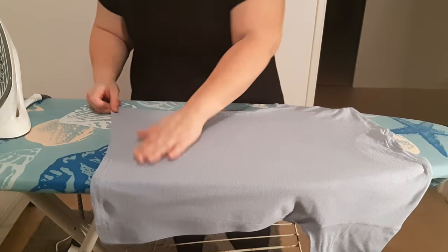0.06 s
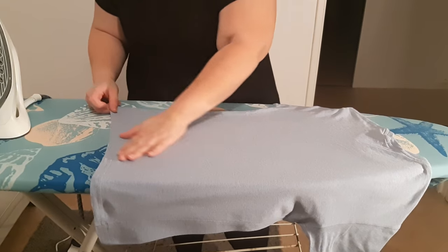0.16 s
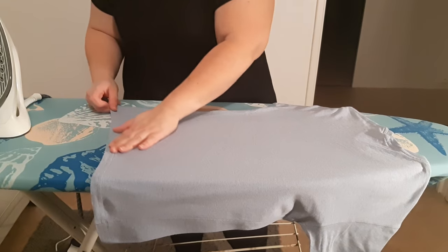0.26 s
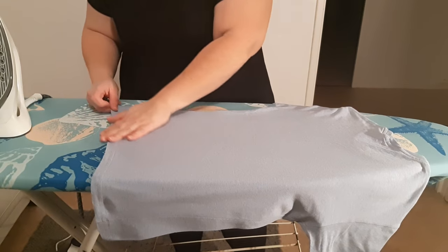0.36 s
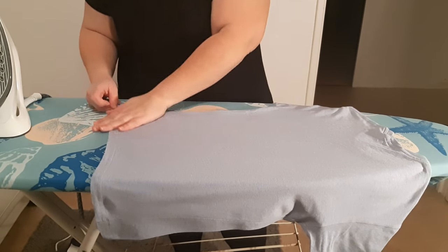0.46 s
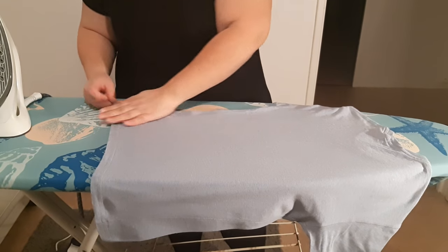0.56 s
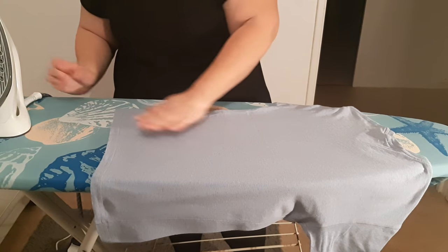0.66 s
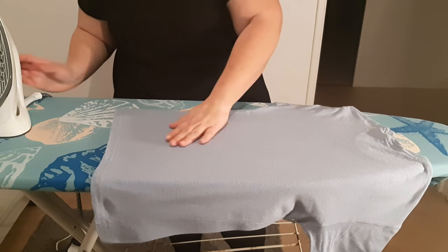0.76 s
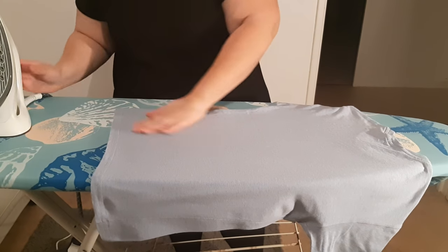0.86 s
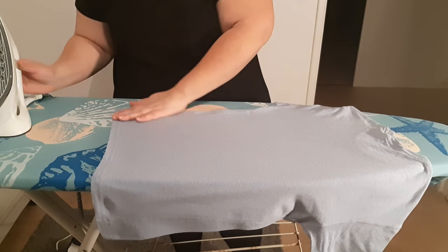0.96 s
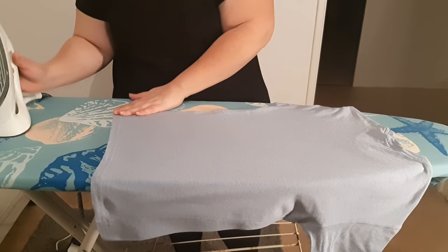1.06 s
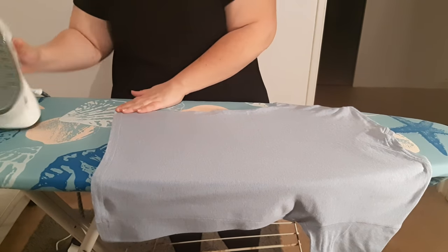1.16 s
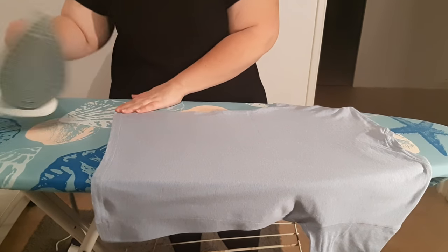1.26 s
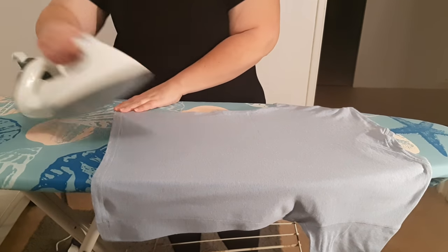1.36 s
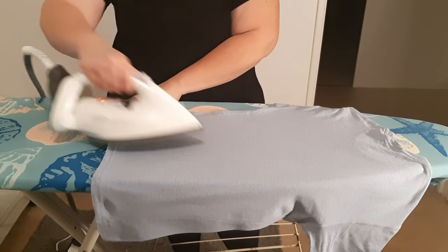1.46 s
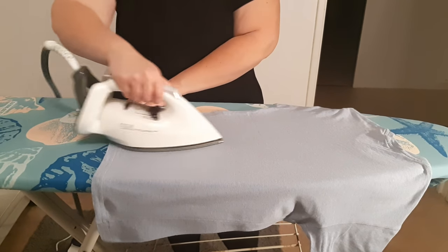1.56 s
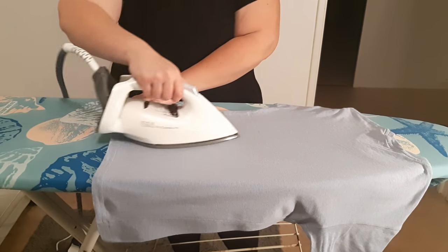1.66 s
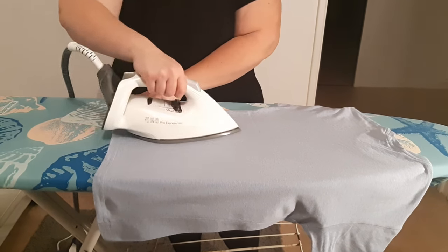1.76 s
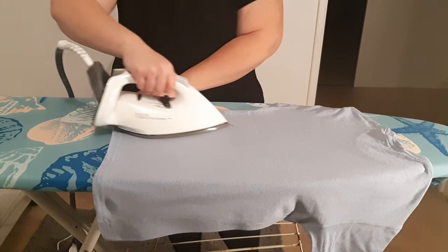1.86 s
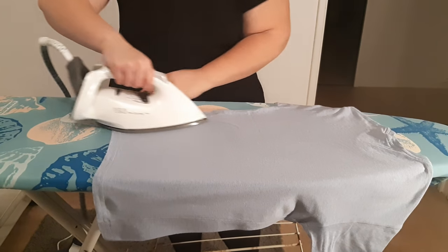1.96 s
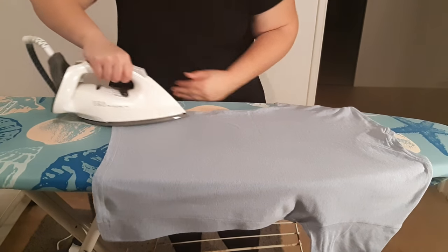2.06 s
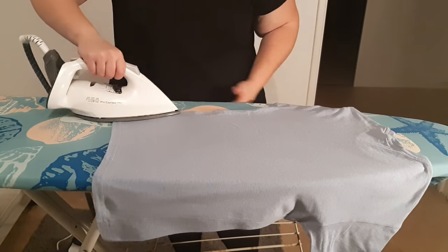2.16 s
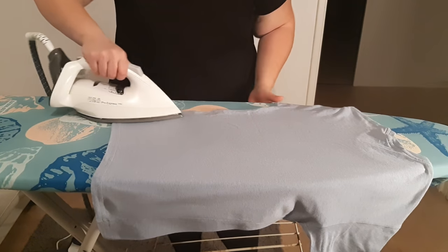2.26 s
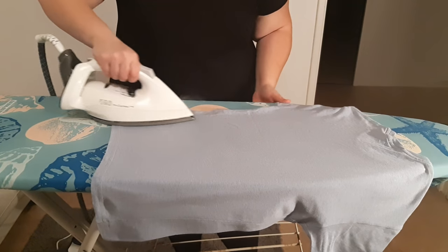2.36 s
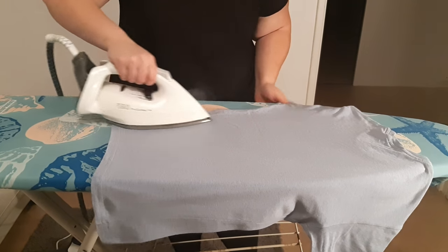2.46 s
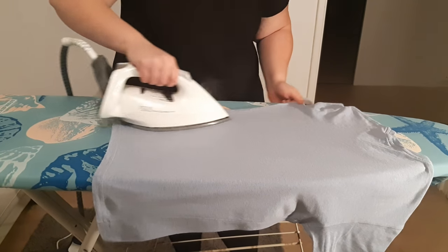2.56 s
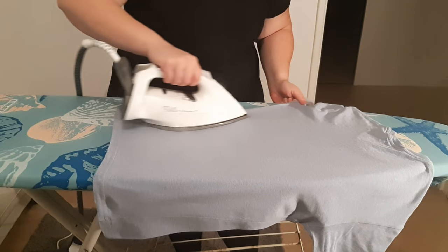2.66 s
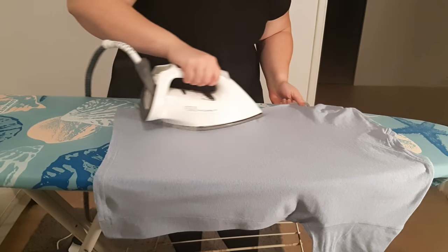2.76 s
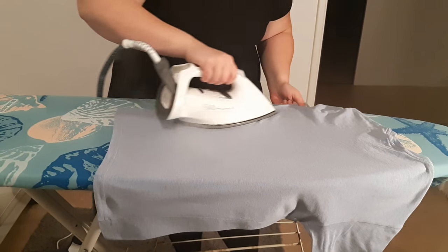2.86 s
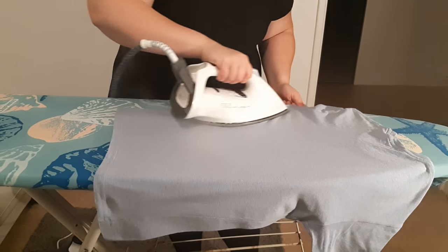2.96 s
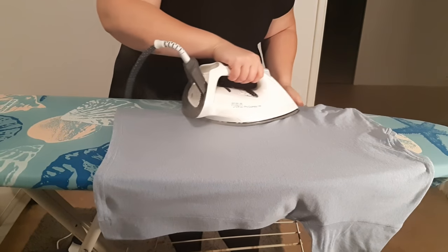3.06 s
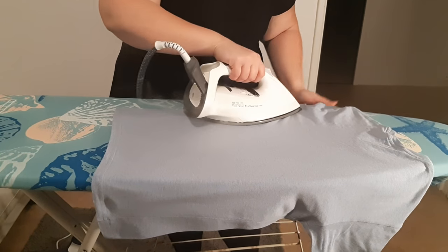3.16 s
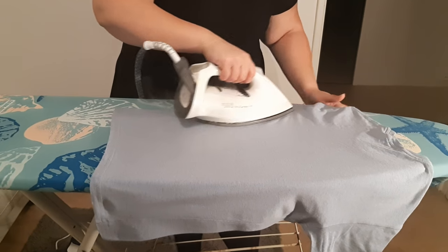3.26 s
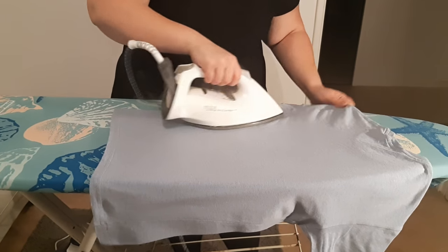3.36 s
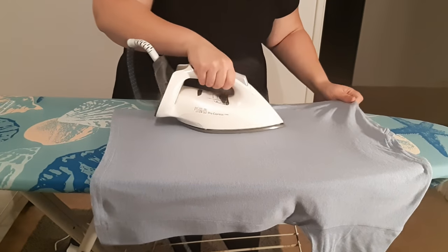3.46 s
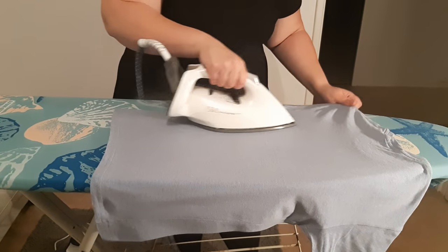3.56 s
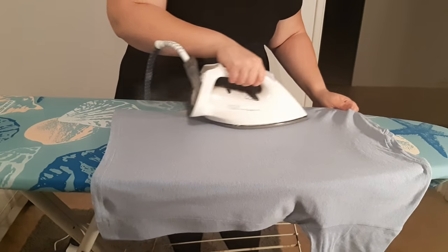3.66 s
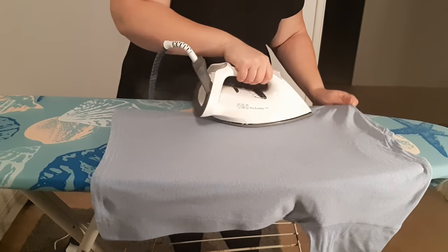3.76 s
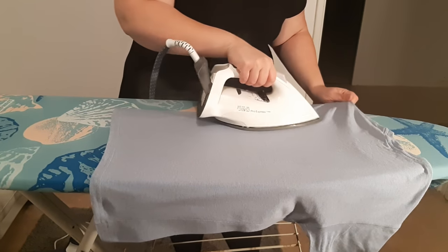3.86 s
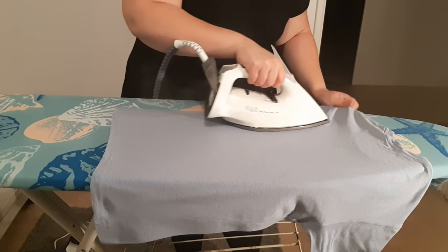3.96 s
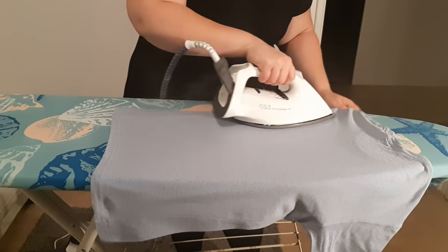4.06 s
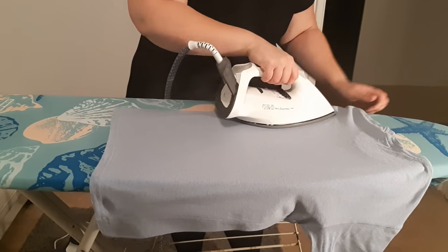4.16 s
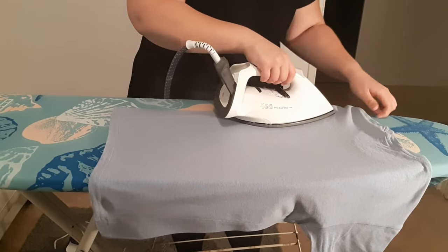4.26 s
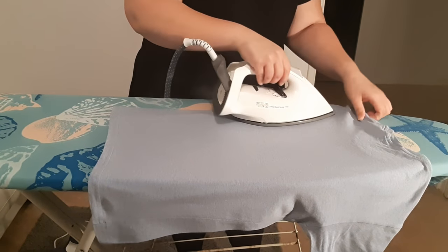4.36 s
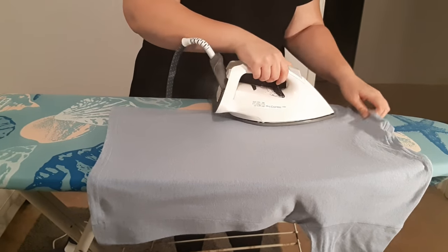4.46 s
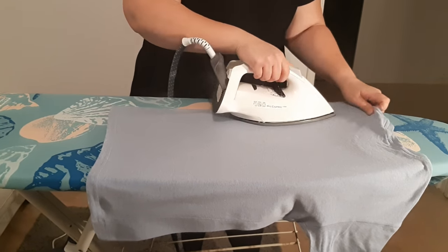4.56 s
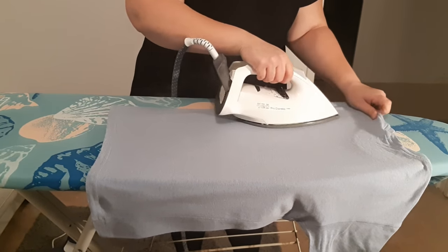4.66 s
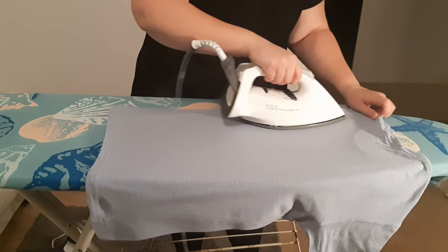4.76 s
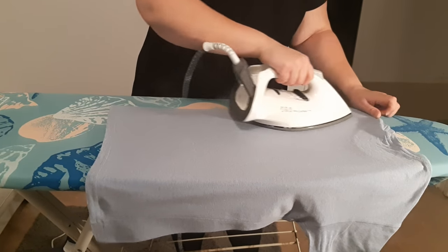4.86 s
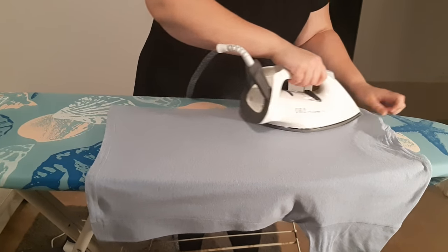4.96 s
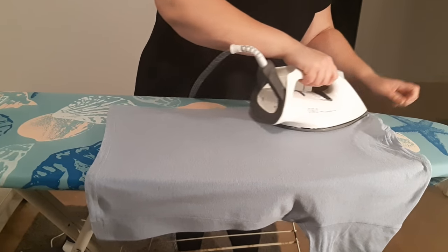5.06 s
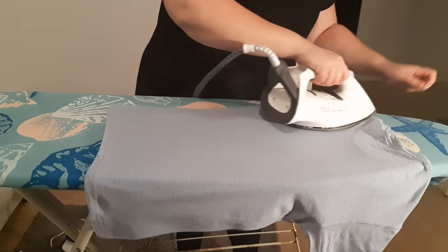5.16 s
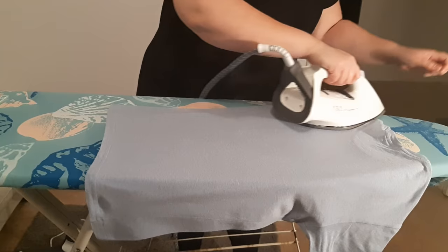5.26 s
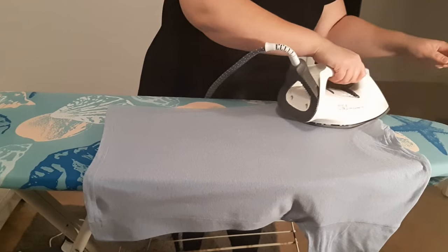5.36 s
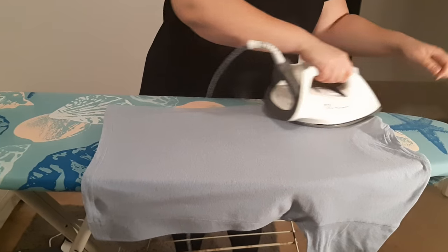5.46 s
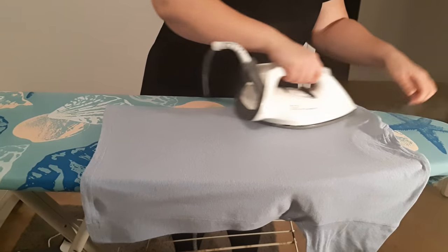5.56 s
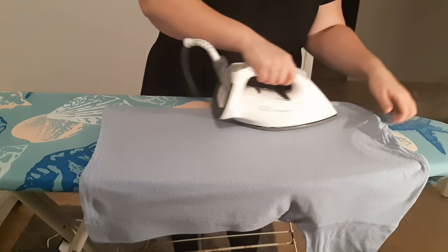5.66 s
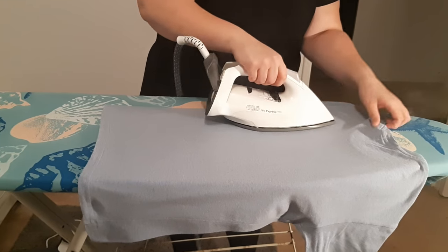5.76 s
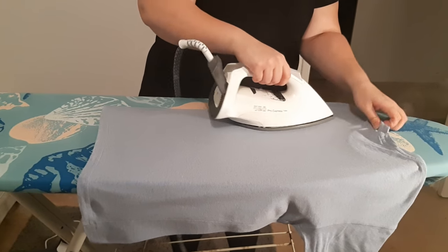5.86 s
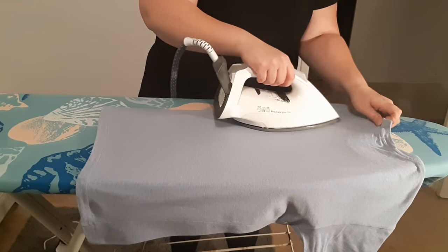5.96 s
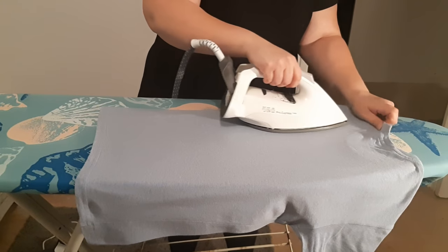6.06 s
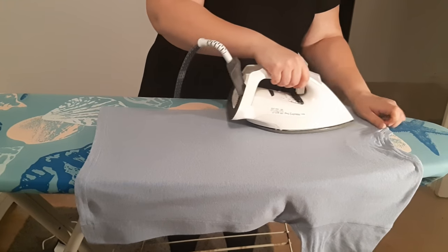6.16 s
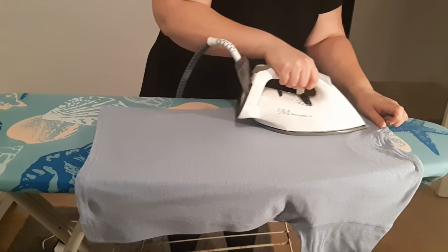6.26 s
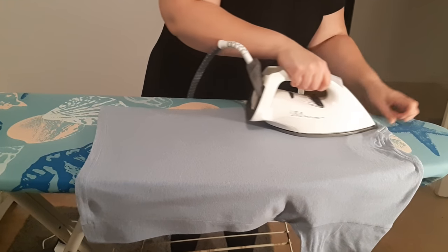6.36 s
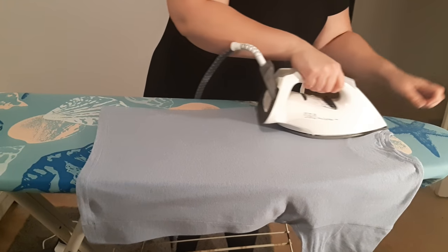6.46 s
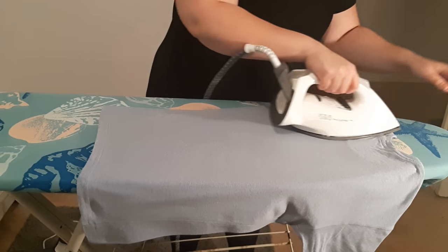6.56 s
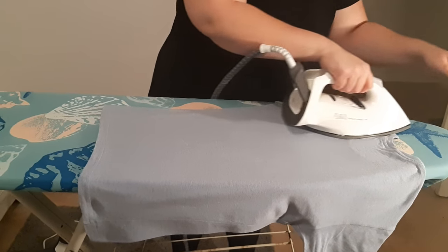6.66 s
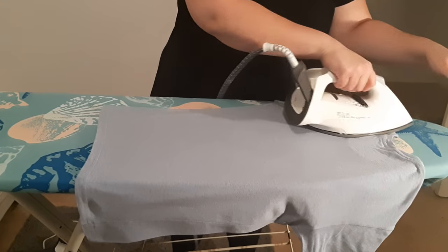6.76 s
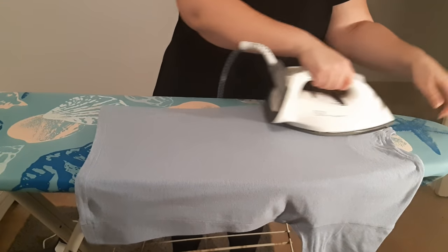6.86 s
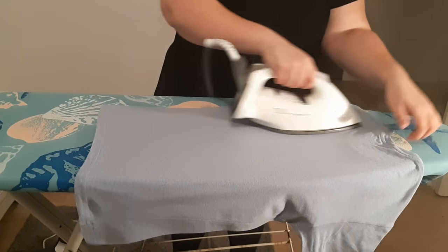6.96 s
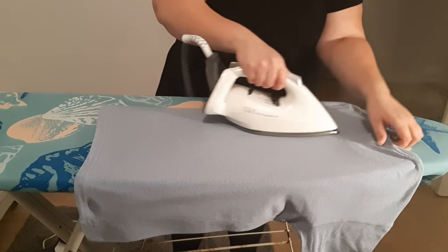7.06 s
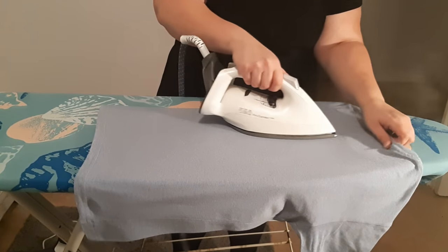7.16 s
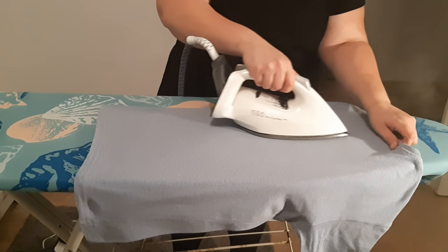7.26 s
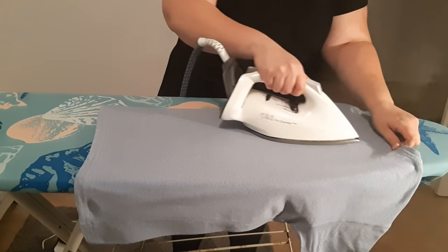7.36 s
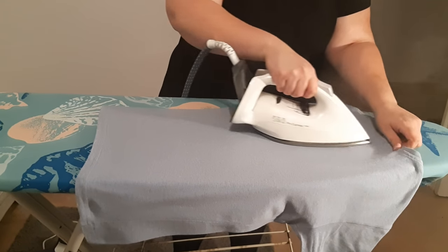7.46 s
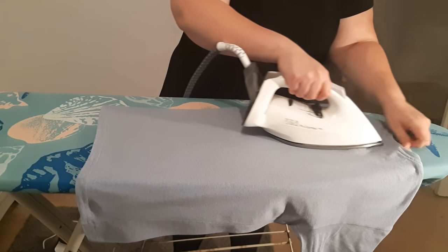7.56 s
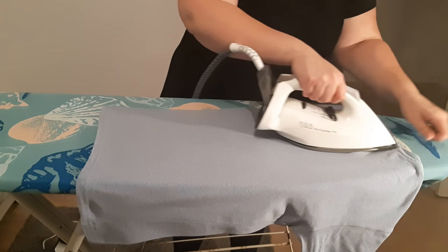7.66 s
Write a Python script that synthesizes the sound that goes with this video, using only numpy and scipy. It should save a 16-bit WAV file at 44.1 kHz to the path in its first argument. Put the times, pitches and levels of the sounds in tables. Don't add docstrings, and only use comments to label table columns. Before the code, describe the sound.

Close stereo pickup in a quiet living room with a low house rumble. A hand softly rustles over cotton, then the iron lands with a cluster of padded knocks and a squeeze of steam. A valve clunks open and a long steam burst roars and hisses, ending in a dull thud. Three shorter bursts follow, separated by faint cloth rubbing, ticks and spitting drops, and a last burst begins at the end.

```python
import sys
import numpy as np
from scipy import signal
from scipy.fft import rfft, irfft, next_fast_len
from scipy.io import wavfile
from scipy.ndimage import uniform_filter1d

SR = 44100
rng = np.random.default_rng(int(sys.argv[2]) if len(sys.argv) > 2 else 0)


def wav_out(sig):
    wavfile.write(sys.argv[1], SR, np.round(np.clip(np.atleast_2d(sig).T, -1, 1) * 32767).astype(np.int16))


def volts(x):
    e = np.asarray(x, float) / 20
    return 10 ** e


N = 340452
SIZE = next_fast_len(N)
HZ = np.maximum(np.arange(SIZE // 2 + 1) * SR / SIZE, 1)
T = np.arange(N) / SR

# (frequency [Hz], density [dB per Hz])
ROOM_TONE = [(190, -48), (330, 2.5), (520, -1.5), (800, -4), (976, 3), (1170, -2), (1990, 5), (4540, -12),
             (5430, -12), (6700, -35), (8000, -13), (15800, -6.5)]
# (frequency [Hz], left minus right [dB])
ROOM_LEAN = [(60, 1), (110, 0.0), (200, 0.5), (380, 2), (700, -2), (1290, -7), (2380, 7), (4400, -10),
             (8120, -5), (15000, 1)]
# (frequency [Hz], density [dB per Hz])
RUMBLE = [(12, -53), (20, -23), (32, -29), (48, -22), (63, -8), (102, 3.5), (163, -1.5), (188, 4.5),
          (206, -13.5), (330, -9.5), (430, -23.5), (730, -120)]
# (frequency [Hz], likeness [0..1])
LIKENESS = [(30, .75), (130, 0.88), (290, 0.97), (640, 0.65), (1400, 0.018), (15000, 0.032)]
# (frequency [Hz], width [Hz], lift [dB])
STANDING = [(235, 12, 1.5), (364.4, 11, 6.5), (975, 35, 3.5), (1138, 9.7, 6), (1389, 24, 5.5),
            (1720, 9.8, 5), (1860, 50, 1), (2162, 18, 4), (2297, 13, 4.5), (2030, 20, 2.5), (3310, 21, 4.5),
            (3750, 20, 5), (4610, 27, 4.5), (4840, 27, 2)]
# (frequency [Hz], gain [dB])
LEFT_PORT = [(300, 0.5), (1000, -3.4), (2500, 0), (3500, -5.5), (4000, -6), (5000, -16.5), (6000, -41),
             (6300, -74), (8100, -80), (8500, -41.5), (11800, -23), (14300, -37), (15500, -34),
             (16000, -90)]
RIGHT_PORT = [(300, -0.06), (1000, 0.5), (2500, 1), (3600, 2.5), (4800, -1.5), (5300, -12), (5900, -9),
              (6700, -8.5), (7400, -15), (8000, -20), (11800, -19), (14000, -22.5), (15750, -29),
              (16000, -87)]

# (start [s], rise [s], length [s], level [dB])
DRAGS = [(-.05, .03, 0.089, -66.5), (0.13, 0.013, 0.092, -69.5), (.27, .05, 0.16, -71),
         (1.087, 0.096, 0.35, -67), (1.587, 0.034, 0.23, -57), (1.853, 0.042, 0.68, -51.5),
         (3.104, 0.12, 0.33, -53), (3.828, 0.058, 0.28, -54.5), (4.15, .06, 0.16, -47.5),
         (4.35, .03, 0.097, -59), (5.294, 0.097, 0.24, -49), (6.287, 0.04, 0.12, -62.5),
         (6.55, 0.36, 0.41, -51), (7.36, 0.03, 0.1, -70), (7.456, .02, .15, -62.5)]
# (frequency [Hz], density [dB per Hz])
DRAG_COLOUR = [(60, -24), (150, -4), (350, -1), (700, -5), (1200, -3), (2500, -8.5)]
# (start [s], rise [s], length [s], peak [dB], end level [dB])
SWISHES = [
    (.14, 0.1, 0.37, -46, -47),
    (.88, .13, 0.24, -45, -46),
    (1.25, 0.084, 0.22, -39.5, -45),
    (6.35, .03, .05, -43, -41),
    (7.36, 0.084, 0.12, -33.5, -37),
]
# (start [s], rise [s], length [s], peak [dB], end level [dB])
STROKES = [(-.05, .03, 0.067, -62, -85), (.13, 0.083, 0.35, -65, -60), (.45, .05, 0.14, -67, -65),
           (.85, 0.16, 0.38, -52.5, -68.5), (1.26, 0.081, 0.26, -64, -75), (3.446, 0.012, 0.045, -43, -48),
           (3.5, .02, .13, -54, -58), (4.5, 0.027, 0.2, -64, -76), (4.69, 0.12, 0.27, -50.5, -56),
           (5.7, .03, 0.31, -55, -85), (5.99, .03, 0.08, -73, -79), (6.1, 0.0054, 0.19, -58.5, -66.5),
           (6.28, 0.043, 0.19, -52, -56.5), (7.15, 0.057, 0.18, -63, -75), (7.35, 0.12, 0.37, -49.5, -68)]
# (frequency [Hz], density [dB per Hz])
CLOTH_COLOUR = [(60, -20), (200, -9.5), (500, -14.5), (1000, -9), (1500, -2), (2500, 0.3), (5000, 2),
                (7000, 6), (9000, 1.5), (16000, -6)]
# (frequency [Hz], share of the level swing)
STROKE_FOLLOW = [(400, 0.73), (1800, 0.81), (5000, 0.93), (7000, 0.3), (12000, .99)]

# (time [s], level [dB])
LANDINGS = [(.131, -28), (.152, -34), (.175, -35), (.218, -38), (.335, -35), (.358, -37), (.397, -36),
            (.49, -38), (1.559, -22), (1.572, -12.5), (1.585, -10.5), (1.606, -19), (1.619, -11),
            (1.67, -21), (1.725, -23), (1.76, -29)]
# (frequency [Hz], level [dB], delay [s], swell [s])
BOARD_MODES = [(42, -62, .001, 0.027), (76.6, -48.5, 0.0029, 0.03), (110, -46.5, 0.00095, 0.021),
               (160.6, -37.5, 0.0021, 0.0094), (202, -36, 0.0013, 0.0052), (271, -50.5, 0.0012, .011),
               (355, -51, 0.0016, 0.0068), (458, -50.5, 0.0011, 0.0074), (623, -57, .001, .004)]
# (time [s], level [dB])
TICKS = [
    (1.569, -16),
    (4.7303, -21),
    (4.7622, -1),
    (6.104, -19),
    (6.2636, -13),
    (6.286, -17),
    (6.3165, -6),
    (6.322, -8),
    (7.4669, -19),
]
# (frequency [Hz], level [dB], delay [s], swell [s])
RIM_MODES = [(1370, -49, 0.0004, 0.0022), (1800, -43, 0.00029, 0.0013), (2240, -45, 0.0003, 0.0014),
             (3100, -49, 0.00024, .0007), (4350, -46, 0.00016, .0006), (6460, -33, 0.00022, 0.00084),
             (10400, -34, 0.00022, .0004)]

# (time [s], level [dB])
OPENS = [
    (1.846, -1),
    (3.625, -1.5),
    (4.9253, -1),
    (6.4845, -0.5),
    (7.625, -0.4),
]
# (time [s], level [dB])
SHUTS = [
    (3.222, -1),
    (4.202, -1.5),
    (5.441, 0),
    (6.842, -1),
]
# (frequency [Hz], level [dB], delay [s], swell [s])
CASING_MODES = [(88, -65.5, 0.0032, 0.042), (115.7, -58.5, 0.005, 0.047), (171, -42.5, 0.0139, 0.0092),
                (241.3, -45, 0.0038, 0.012), (250, -43, .038, 0.009), (742, -39, 0.033, 0.008),
                (493, -52.5, 0.00089, 0.014), (805, -40, 0.00198, 0.0079), (620, -52, 0.00095, 0.012),
                (856, -40, 0.0015, 0.014), (900, -41.5, 0.022, 0.01), (902, -44, .064, .011),
                (991, -39.5, 0.002, 0.012), (3660, -45, 0.006, 0.012), (3910, -44.5, 0.0069, 0.013),
                (4350, -39, .005, 0.007), (4420, -40, .014, 0.01), (4700, -48, 0.008, 0.014),
                (6500, -50, 0.0059, .014), (6940, -31, 0.009, 0.007), (7050, -27, 0.011, 0.009),
                (7150, -42, .012, .016)]
# (frequency [Hz], level [dB], delay [s], swell [s])
CLOSING_MODES = [(100.4, -59.5, 0.0143, 0.039), (174, -44, 0.0217, 0.017), (229.4, -53.5, 0.0125, 0.023),
                 (390, -56, 0.00626, 0.014)]
# (frequency [Hz], level [dB], delay [s], swell [s])
TANK_MODES = [(334, -47.5, 0.0014, 0.015), (392, -46, 0.0013, 0.0085), (359, -50.5, .03, .012),
              (420, -53, .055, 0.016)]
TANK_HEARD_DB = [0, -14, -0.5, -1, 0.5]

# (time [s], peak [dB], 60 dB decay [s])
SPITS = [
    (4.7614, -36, 0.12),
    (6.104, -64, 0.05),
    (6.3175, -41, 0.13),
    (7.468, -39, 0.08),
]
# (frequency [Hz], density [dB per Hz])
SPIT_COLOUR = [(300, -20), (1000, -19), (1500, 4), (2100, 12), (3000, -1), (4500, -2), (6000, 13),
               (16000, -4)]
# (start [s], end [s], frequency [Hz], width [Hz], level [dB rms])
WHISTLES = [(1.6, 1.89, 2312, 14, -46.5), (1.85, 1.97, 6950, 300, -39), (2.9, 3.4, 1148, 30, -50),
            (3.65, 4.35, 1146, 30, -54), (5.2, 5.55, 1146, 30, -54), (3.9, 4.8, 355, 60, -70),
            (4.43, 4.63, 400, 60, -64), (6.87, 7.06, 6050, 60, -40), (4.72, 4.92, 6050, 100, -48),
            (3.55, 3.63, 6050, 150, -56), (1.9, 2.9, 11800, 350, -42), (2.7, 3.2, 9300, 500, -48),
            (1.6, 1.85, 9500, 200, -55), (-.2, .6, 985, 60, -76), (1.25, 1.6, 985, 40, -75),
            (.04, .16, 1365, 30, -72), (.36, .47, 1370, 30, -74), (.15, .45, 1900, 50, -75),
            (1.1, 1.55, 1420, 50, -75), (5.7, 6.5, 985, 60, -82), (7.1, 7.6, 985, 60, -79)]
# (start [s], end [s], frequency [Hz], width [Hz], level [dB rms])
POCKETS = [(1.62, 1.99, 2910, 110, -47.5), (1.64, 1.77, 1400, 150, -53), (1.67, 1.822, 1780, 120, -52),
           (1.66, 1.82, 3250, 150, -54), (2.07, 2.17, 2600, 250, -32), (2.1, 2.203, 3490, 200, -41),
           (2.15, 2.53, 4020, 110, -38), (2.3, 2.46, 2700, 450, -34), (2.95, 3.2, 3000, 500, -35.5),
           (3.0, 3.3, 3600, 200, -44), (3.7, 3.948, 2650, 200, -40.5), (4.098, 4.3, 2650, 200, -41.5),
           (5.0, 5.25, 3100, 500, -46), (5.348, 5.5, 3000, 500, -37), (6.7, 6.93, 3000, 600, -34),
           (4.78, 4.87, 1150, 120, -64), (.128, .24, 385, 70, -66), (0, .08, 350, 70, -70),
           (1.31, 1.5, 6600, 300, -62), (1.57, 1.63, 6500, 600, -45), (2.45, 2.6, 7200, 400, -36),
           (3.455, 3.5, 2300, 400, -47), (4.715, 4.9, 6750, 300, -46), (6.35, 6.48, 380, 220, -64),
           (6.23, 6.33, 1550, 300, -64)]
# (frequency [Hz], density [dB per Hz])
JET_COLOUR = [(60, -34), (250, -25.5), (600, -17.5), (1500, -13), (4000, -21), (6500, -6.5), (9000, -0.5),
              (16000, -1)]
# (frequency [Hz], density [dB per Hz])
CRACK_COLOUR = [(3000, -30), (8000, -4), (12000, -6), (14500, 4), (16000, 11)]
# (start [s], rise [s], length [s], peak [dB], end level [dB])
PUFFS = [(1.6, 0.048, 0.1, -28, -27), (1.72, 0.047, 0.12, -28.5, -29), (3.15, 0.072, 0.22, -17, -29),
         (3.452, .004, 0.045, -31, -36), (3.54, .04, .08, -37, -39), (4.18, 0.018, 0.14, -22, -19.5),
         (4.73, .03, 0.14, -35, -36), (4.76, .003, .04, -29, -32), (5.33, .11, 0.13, -16.5, -16),
         (5.56, .02, .05, -32, -34), (5.695, .008, 0.031, -30, -33), (6.315, .01, .045, -36, -36),
         (6.45, .02, 0.026, -34, -41), (6.8, 0.022, 0.058, -16.5, -21), (6.95, .01, .05, -24, -27),
         (7.46, .01, .04, -31, -36)]
# (frequency [Hz], density [dB per Hz])
PUFF_COLOUR = [(300, -64), (1000, -27.5), (3000, -21), (6500, -5), (9000, 6), (12000, 3), (16000, 7.5)]
# (time [s], level [dB])
FLOWS = [
    [(1.562, -44), (1.61, -43), (1.68, -44), (1.84, -47)],
    [(1.848, -54.5), (2.0, -43), (2.11, -30.5), (2.3, -29.5), (2.36, -26.5), (2.6, -30.5), (2.9, -31.5),
     (3.0, -29.5), (3.27, -26)],
    [(3.628, -42.5), (3.7, -37.5), (3.85, -29), (3.93, -33.5), (4.12, -34), (4.25, -31)],
    [(4.928, -40.5), (5.09, -35), (5.19, -36.5), (5.25, -32.5), (5.29, -34.5), (5.35, -29.5), (5.46, -24.5)],
    [(6.488, -42), (6.62, -34.5), (6.74, -29), (6.87, -25)],
    [(7.628, -42), (7.68, -37), (7.72, -33.5)],
]
# (frequency [Hz], density [dB per Hz])
STEAM_COLOUR = [(60, -56), (200, -36), (500, -20.5), (1000, -9.5), (1600, -4.5), (3100, -0.1), (5000, -2),
                (9000, -4.5), (16000, -17)]
# (frequency [Hz], share of the level swing)
FLOW_FOLLOW = [(400, 0.88), (1800, 0.92), (5000, 1.11), (7000, 0.62), (12000, 0.75)]
# (time [s], slant [dB per octave])
VENTING = [(1.6, -0.5), (1.95, -2), (2.2, 0.5), (2.5, -0.5), (2.75, 2), (2.95, 2.5), (3.2, -0.3),
           (3.5, -3.5), (3.9, -0.5), (4.3, -1), (4.7, -4.5), (5.1, 0), (5.36, 0.5), (5.8, 0), (6.5, -0.5),
           (6.85, 0), (7.2, -1.5), (7.7, -1)]


def rms_one(x):
    return x / np.sqrt(np.mean(x ** 2) + 1e-20)


def at_hz(points, hz):
    points = np.array(points)
    return np.interp(np.log(hz), np.log(points[:, 0]), points[:, 1])


def sound(spectrum):
    return irfft(spectrum, SIZE)[:, :N]


def drift(rate):
    r = np.exp(-2 * np.pi * rate * 40 / SR)
    slow = signal.lfilter([1], [1, -2 * r, r * r], rng.standard_normal(N // 40 + 2002))[2000:]
    return np.interp(np.arange(N) / 40, np.arange(len(slow)), rms_one(slow))


def stereo_noise(colour, low_hz, high_hz, near=0):
    mid, side, here, there = rng.standard_normal((4, SIZE))
    alike = at_hz(LIKENESS, HZ)
    common, apart = np.sqrt(1 + alike) * rfft(mid), np.sqrt(1 - alike) * rfft(side)
    noise = (common + apart * [[1], [-1]]) / np.sqrt(2)
    if near:
        t = np.arange(SR // 4) / SR
        echoes = rng.standard_normal((2, 2, len(t))) * volts(-60 * t / 0.12)
        combed = irfft(rfft(echoes, SIZE) * rfft([[here], [there]]), SIZE)
        turn = np.pi / 2 * (0.5 + 0.5 * np.sin(np.arange(SIZE) / SR * 2.326))
        spot = rfft(rms_one(np.cos(turn) * combed[0] + np.sin(turn) * combed[1]))
        share = near * (1 - alike)
        noise = np.sqrt(1 - share) * noise + np.sqrt(share) * spot
    gain = volts(at_hz(colour, HZ))
    heard_band = (HZ > low_hz) & (HZ < high_hz)
    return noise * gain / np.sqrt(np.sum(gain[heard_band] ** 2) / len(HZ))


def split_bands(spectrum, centres_octave):
    for k in range(len(centres_octave)):
        only_k = np.arange(len(centres_octave)) == k
        yield sound(spectrum * np.interp(np.log2(HZ), centres_octave, only_k))


def patchy(spectrum, centres_hz, depth_db, rate):
    return sum(volts(depth_db * drift(rate)) * band for band in split_bands(spectrum, np.log2(centres_hz)))


def hiss(level, mean_db, follow, colour, gust_db, flicker_db, flicker_hz, near, slant_db=0):
    swing_db = np.maximum(20 * np.log10(level) - mean_db, -30)
    gust = drift(9)
    centres = np.log2(330) + np.arange(0, 5.7, 0.7)
    out = 0
    for centre, band in zip(centres, split_bands(stereo_noise(colour, 1500, 5000, near), centres)):
        follow_db = (at_hz(follow, 2 ** centre) - 1) * swing_db
        tilt_db = follow_db + slant_db * (centre - np.log2(3000))
        out = out + band * volts(tilt_db + gust_db * gust + flicker_db * drift(flicker_hz))
    return level * out


def swells(rows, fade_db_per_s):
    power = 1e-14
    for start, rise, lasts, peak_db, end_db in rows:
        age = T - start
        level_db = np.interp(age, [rise, max(lasts, rise + 0.001)], [peak_db, end_db])
        level_db = level_db - fade_db_per_s * np.maximum(age - lasts, 0)
        power = power + (np.clip(age / rise, 0, 1) ** 1.18 * volts(level_db)) ** 2
    return np.sqrt(power)


def struck(hits, modes, spread_db):
    out, t = np.zeros(N + SR), np.arange(SR // 3) / SR
    for s, blow_db in hits:
        start = round(s * SR)
        for (hz, mode_db, delay, swell), chance in zip(modes, rng.standard_normal(len(modes))):
            age = np.maximum(t - delay, 0)
            shape = np.sqrt(age / swell) * np.exp(1 - age / swell)
            ring = shape * np.sin(2 * np.pi * hz * age)
            out[start:start + len(t)] += volts(blow_db + mode_db + spread_db * chance) * ring
    return out[:N]


def room_tone():
    lean = volts(at_hz(ROOM_LEAN, HZ) / 2 * [[1], [-1]])
    rumble = volts(-69.5 + 2.5 * drift(1.8)) * sound(stereo_noise(RUMBLE, 20, 370))
    return rumble + volts(-71.5) * sound(stereo_noise(ROOM_TONE, 330, 18000) * lean)


def standing_waves(at):
    return volts(sum(lift_db / (1 + (2 * (at - hz) / width_hz) ** 2) for hz, width_hz, lift_db in STANDING))


def walls(x, t60, wet_db):
    t = np.arange(SR // 2) / SR
    tail = rng.standard_normal((2, len(t))) * volts(-60 * t / t60) * (t > 0.008)
    apart = signal.sosfilt(signal.butter(2, 500, "high", fs=SR, output="sos"), tail[1])
    both = tail[0] - 0.59 * signal.lfilter(*signal.butter(1, 230, fs=SR), tail[0])
    tail = np.array([both + apart, both - apart])
    tail = tail / np.sqrt(np.sum(tail ** 2) / 2)
    return x + volts(wet_db) * signal.fftconvolve(x[None], tail, axes=1)[:, :N]


def drags():
    low = swells([(*row, row[-1]) for row in DRAGS], fade_db_per_s=108) * volts(1.5 * drift(17))
    swish = swells(SWISHES, fade_db_per_s=110) * sound(stereo_noise(PUFF_COLOUR, 7600, 18300))
    return low * sound(stereo_noise(DRAG_COLOUR, 210, 1480)) + swish


def cloth_rub():
    rub = swells(STROKES, fade_db_per_s=150)
    return volts(2.0) * hiss(rub, -54.5, STROKE_FOLLOW, CLOTH_COLOUR, gust_db=1.0, flicker_db=0.54,
                           flicker_hz=12, near=0.63)


def knocks():
    tank_hits = [(s, db + heard_db) for (s, db), heard_db in zip(OPENS, TANK_HEARD_DB)]
    valve = struck(OPENS, CASING_MODES, spread_db=0.8) + struck(tank_hits, TANK_MODES, spread_db=0.8)
    closing = struck(SHUTS, CLOSING_MODES, spread_db=1.5)
    board = struck(LANDINGS, BOARD_MODES, spread_db=3)
    ticks = struck(TICKS, RIM_MODES, spread_db=3)
    close = board + closing + volts(-4) * valve
    to_walls = volts(-5) * valve + ticks + volts(5) * board + volts(-5) * closing
    out = close + walls(to_walls, t60=0.5, wet_db=1.5)
    side_wall = np.pad(out, ((0, 0), (round(0.013 * SR), 0)))[:, :N]
    return out + volts(-20) * side_wall * [[1], [-1]]


def spits():
    envelope = sum((T > s) * volts(peak_db - 5 - 60 * np.maximum(T - s, 0) / t60) for s, peak_db, t60 in SPITS)
    return envelope * sound(stereo_noise(SPIT_COLOUR, 1500, 5000))


def whistles():
    out = np.zeros((2, N))
    for start, end, hz, width_hz, level_db in [*WHISTLES, *POCKETS]:
        r = np.exp(-np.pi * width_hz / SR)
        poles = [1, -2 * r * np.cos(2 * np.pi * hz / SR), r * r]
        once = signal.lfilter([1], poles, rng.standard_normal((2, N)))
        tone = rms_one(signal.lfilter([1], poles, once))
        if width_hz < 55:
            tone = tone[:1]
        tone = tone / np.sqrt(uniform_filter1d(tone ** 2, round(0.049 * SR)) + 0.057)
        out += volts(level_db) * tone * np.sin(np.pi * np.clip((T - start) / (end - start), 0, 1)) ** 0.42
    return out


def jets():
    jet_db, crack_db, puff_fade_db_per_s = -27.5, -21, 202
    ends = [s + 0.035 for s, _ in SHUTS] + [N / SR]
    even = swells([(s, 0.006, end - s, jet_db, jet_db) for (s, _), end in zip(OPENS, ends)], fade_db_per_s=162)
    jet_noise = patchy(stereo_noise(JET_COLOUR, 8300, 15600), [5000, 7540, 9500, 12000, 15000],
                       depth_db=2.0, rate=2.9)
    holes = even * volts(1.1 * drift(5.5) + 0.47 * drift(14)) * jet_noise
    cracks = swells([(s + 0.0048, 0.005, 0.04, crack_db, crack_db - 3) for s, _ in OPENS], puff_fade_db_per_s)
    crack = cracks * sound(stereo_noise(CRACK_COLOUR, 6800, 17400))
    puffs = swells(PUFFS, puff_fade_db_per_s) * sound(stereo_noise(PUFF_COLOUR, 6800, 17700))
    return holes + crack + puffs


def steam_flow():
    level = 1e-7
    for curve in FLOWS:
        s, level_db = np.transpose(curve)
        after = np.maximum(T - s[-1], 0)
        fade = volts(-122 * after) + volts(-37 - 69 * after)
        onset = np.clip((T - s[0]) / 0.028, 0, 1)
        level = level + onset * volts(np.interp(T, s, level_db)) * fade
    rush = sum((T > s) * volts(-50 - 705 * np.maximum(T - s, 0)) for s, _ in OPENS)
    return level + rush


def steam():
    slant_db = np.interp(T, *np.transpose(VENTING))
    return volts(3.0) * hiss(steam_flow(), -30, FLOW_FOLLOW, STEAM_COLOUR, gust_db=0.43, flicker_db=1.07,
                           flicker_hz=3.4, near=0.44, slant_db=slant_db)


def scene():
    return drags() + cloth_rub() + knocks() + spits() + whistles() + jets() + steam()


def causal(gain, size):
    echo = irfft(np.log(gain[1]), size)
    echo[(size + 1) // 2:] = 0
    return gain * np.exp(2j * rfft(echo, size).imag)


def roll_off(x):
    return signal.sosfilt(signal.butter(12, 15850, fs=SR, output="sos"), x)


def record(dry):
    size = next_fast_len(N + SR // 2)
    hz = np.maximum(np.arange(size // 2 + 1) * SR / size, 1)
    bass_loss = np.sqrt(1 + (58 / hz) ** 4)
    ports = volts([at_hz(LEFT_PORT, hz), at_hz(RIGHT_PORT, hz)]) / bass_loss
    heard = irfft(rfft(dry, size) * causal(ports * standing_waves(hz), size), size)[:, :N]
    return roll_off(heard + room_tone())


dry = scene()
out = record(dry)
wav_out(out)
```